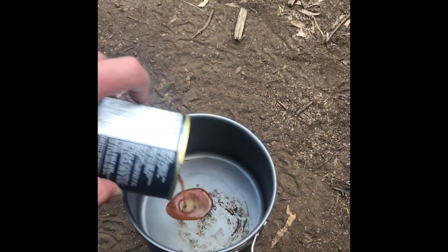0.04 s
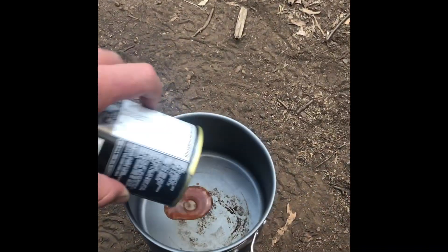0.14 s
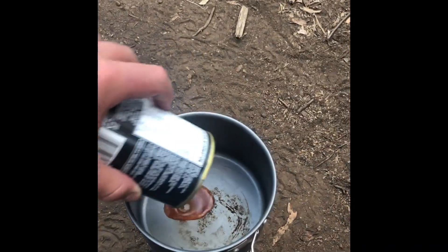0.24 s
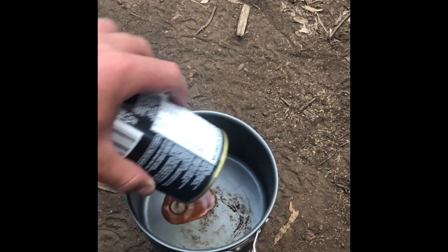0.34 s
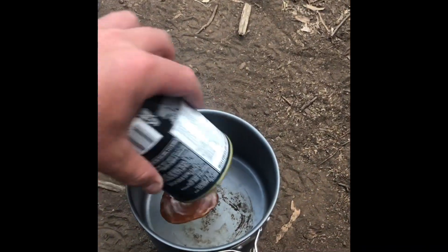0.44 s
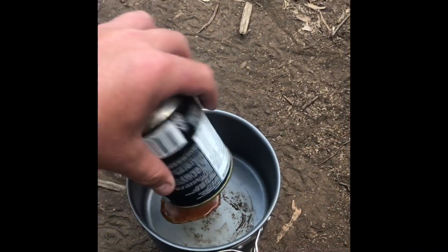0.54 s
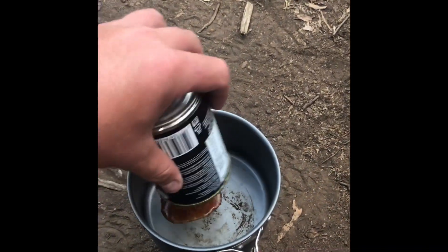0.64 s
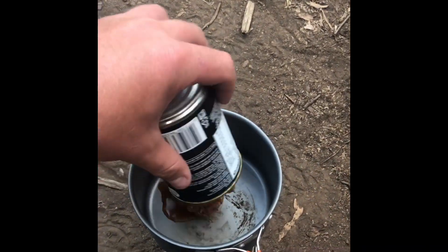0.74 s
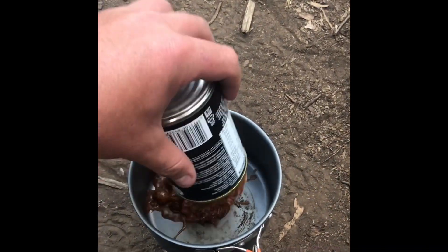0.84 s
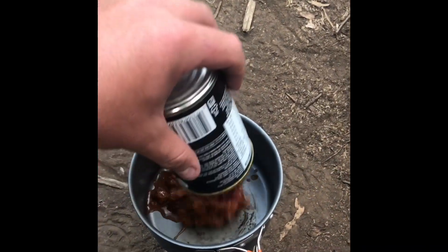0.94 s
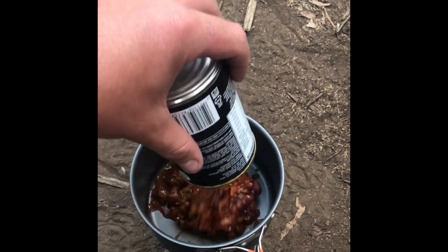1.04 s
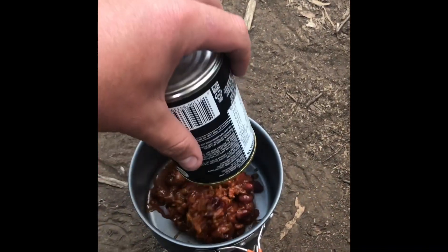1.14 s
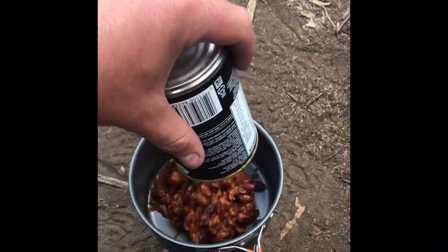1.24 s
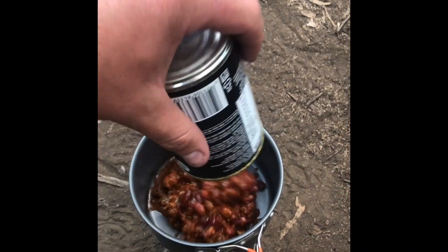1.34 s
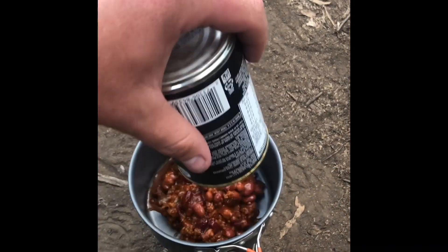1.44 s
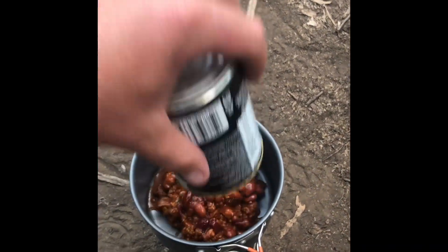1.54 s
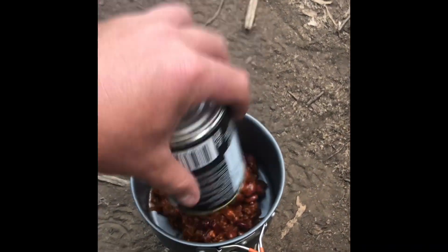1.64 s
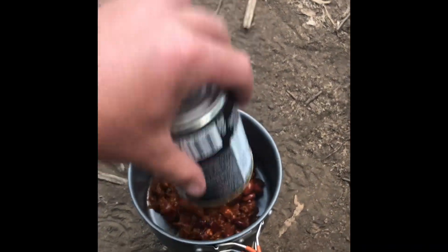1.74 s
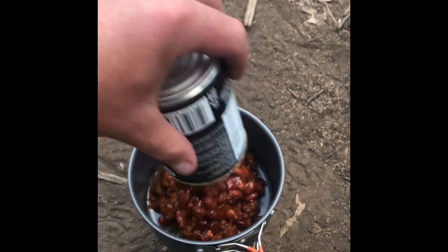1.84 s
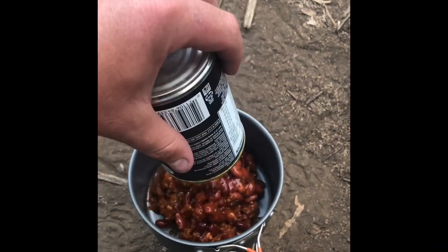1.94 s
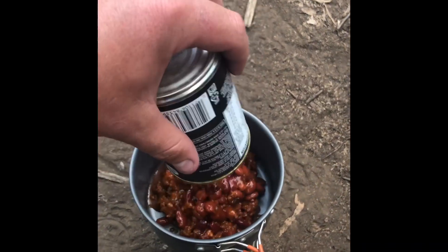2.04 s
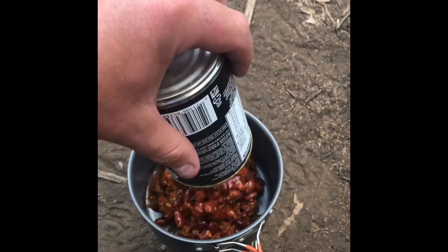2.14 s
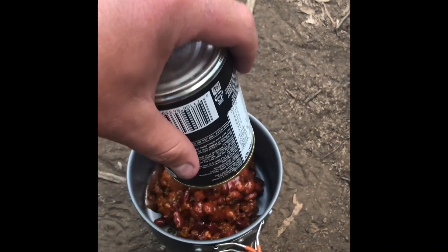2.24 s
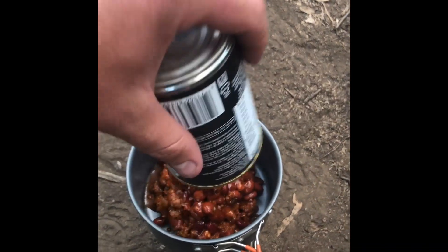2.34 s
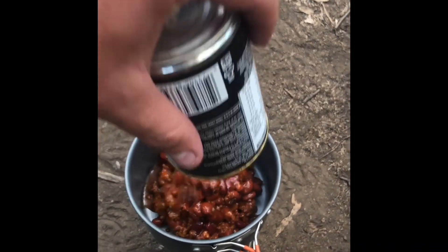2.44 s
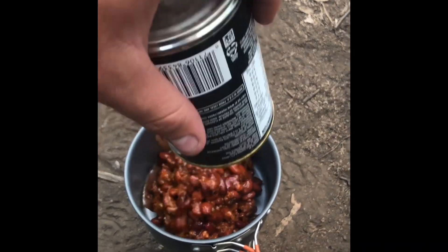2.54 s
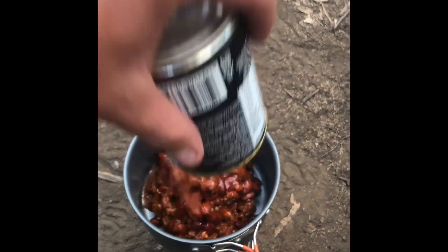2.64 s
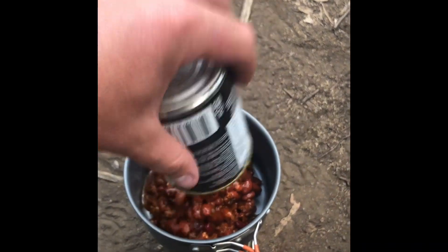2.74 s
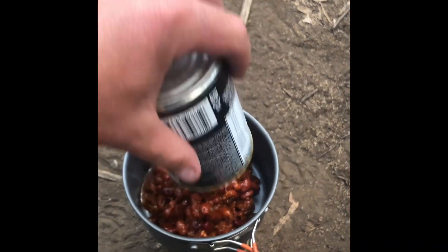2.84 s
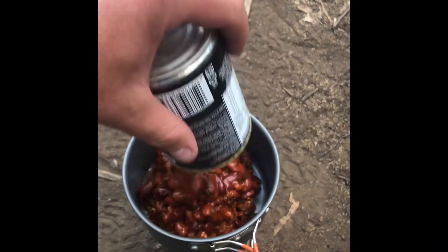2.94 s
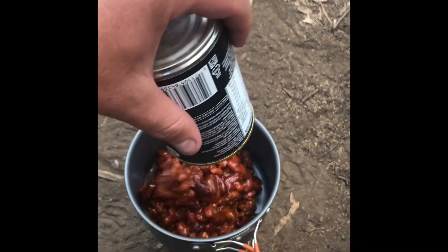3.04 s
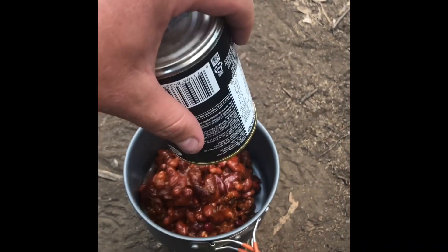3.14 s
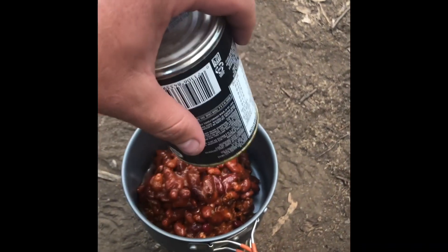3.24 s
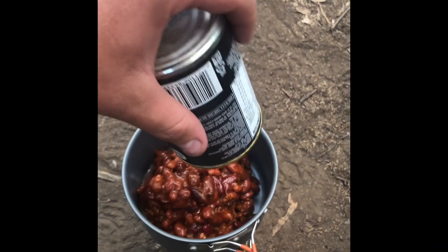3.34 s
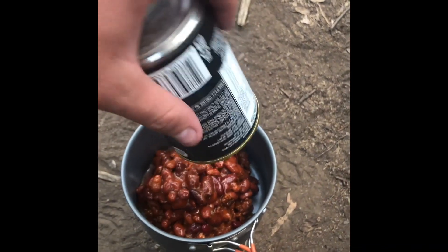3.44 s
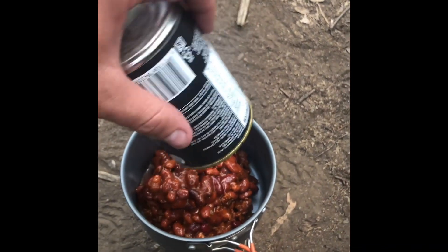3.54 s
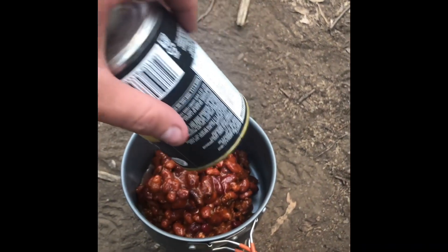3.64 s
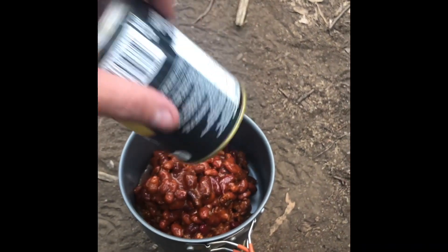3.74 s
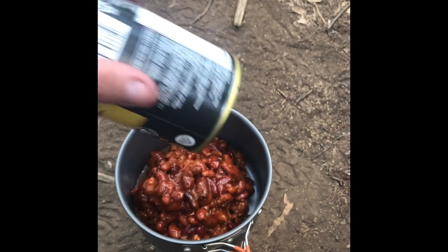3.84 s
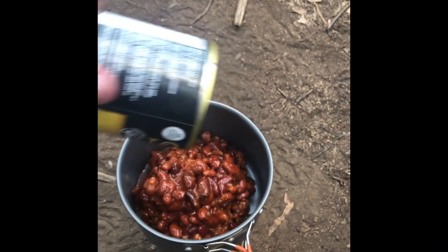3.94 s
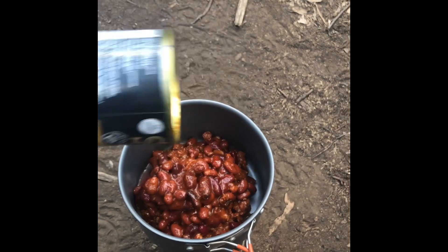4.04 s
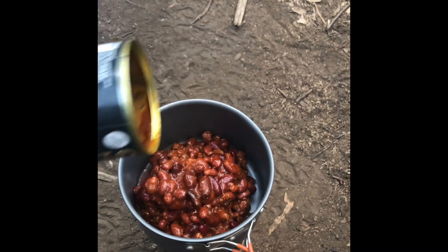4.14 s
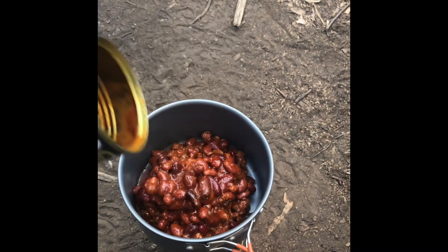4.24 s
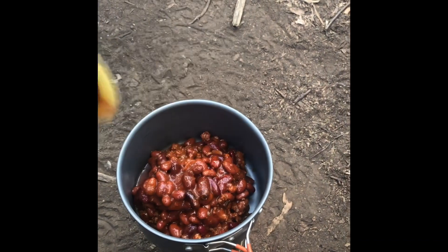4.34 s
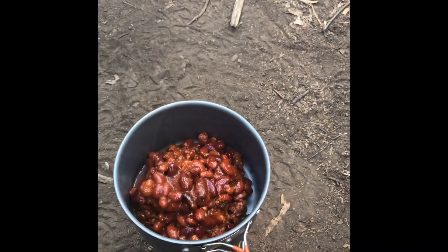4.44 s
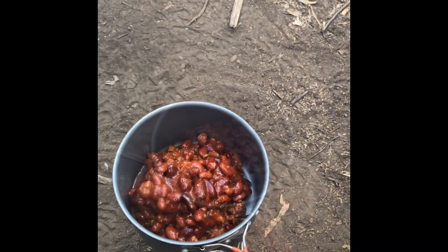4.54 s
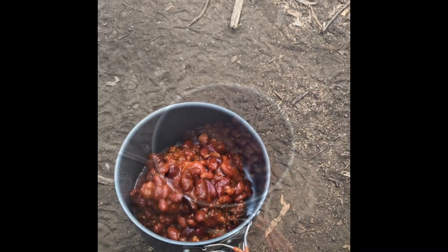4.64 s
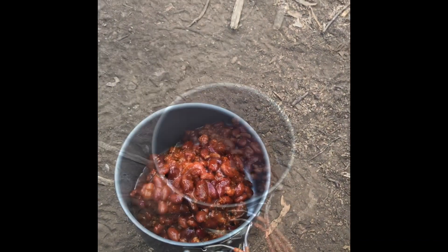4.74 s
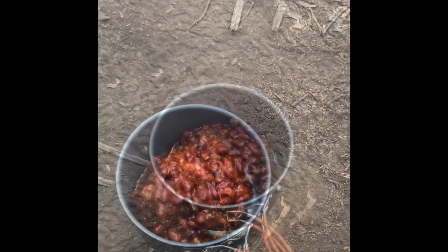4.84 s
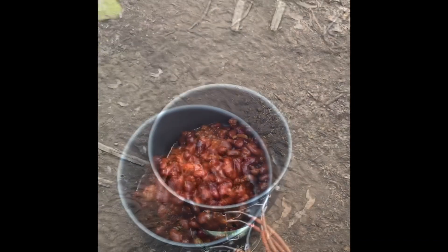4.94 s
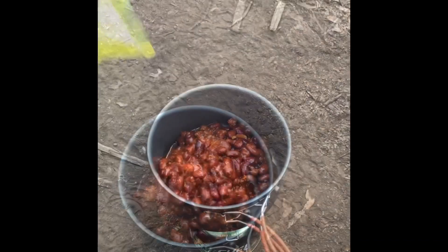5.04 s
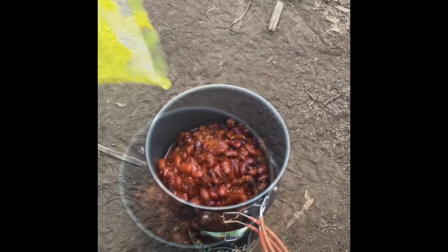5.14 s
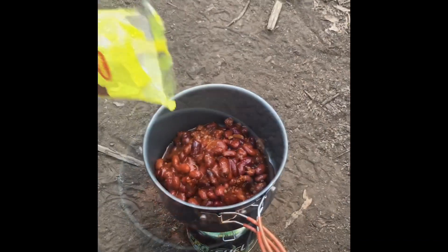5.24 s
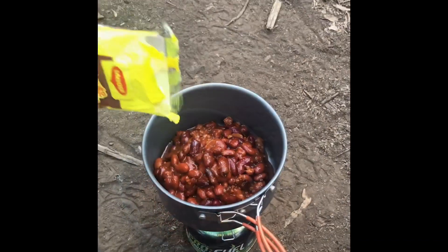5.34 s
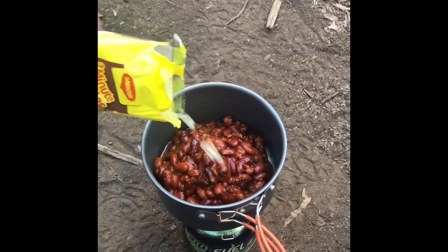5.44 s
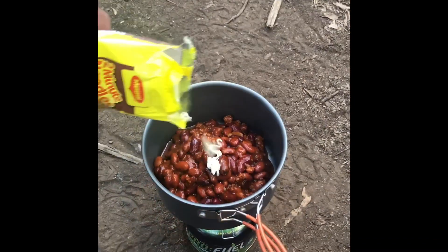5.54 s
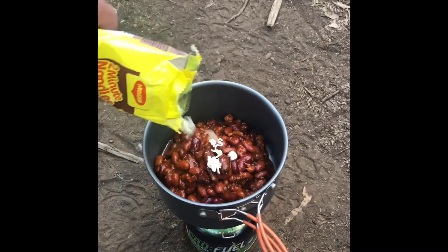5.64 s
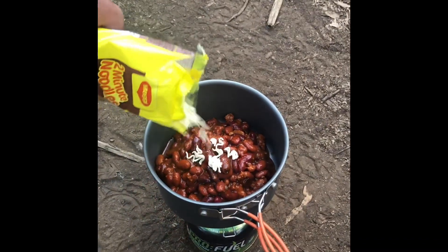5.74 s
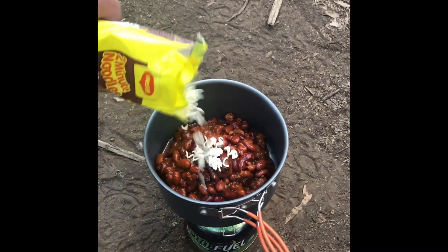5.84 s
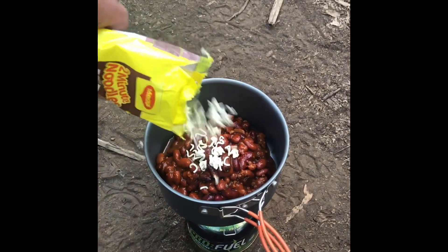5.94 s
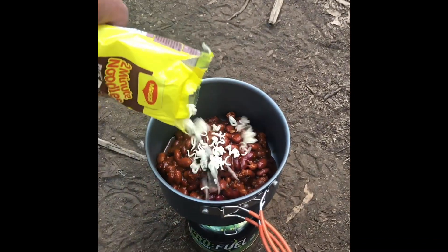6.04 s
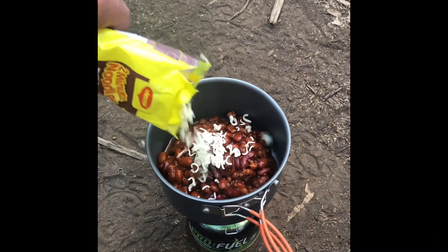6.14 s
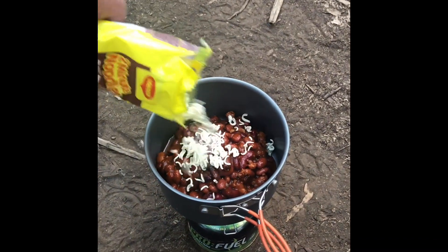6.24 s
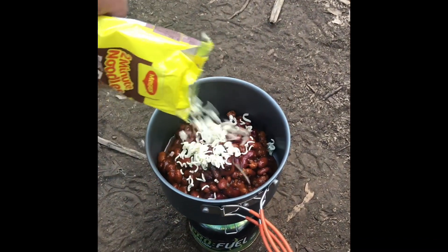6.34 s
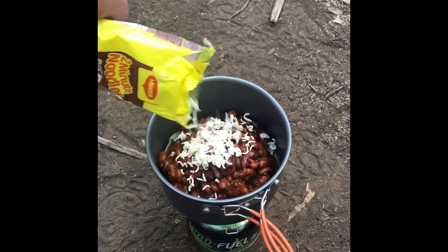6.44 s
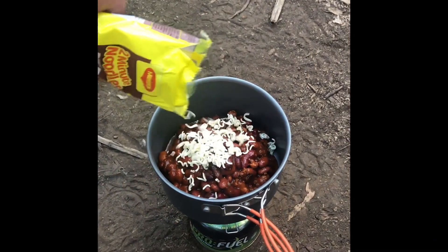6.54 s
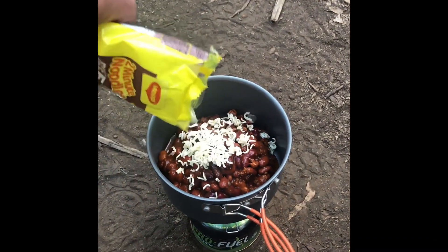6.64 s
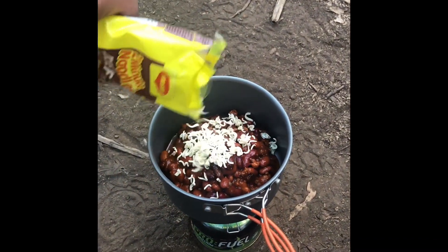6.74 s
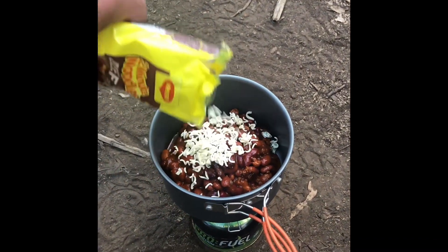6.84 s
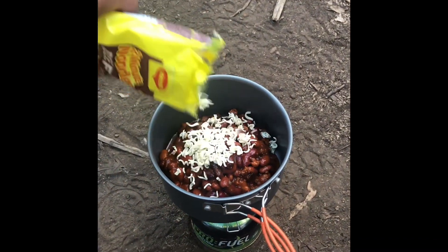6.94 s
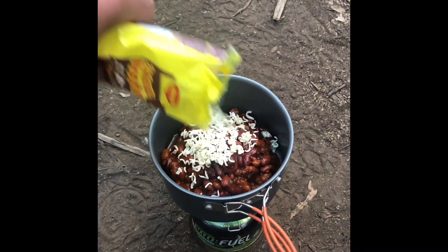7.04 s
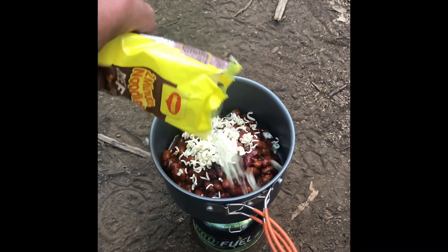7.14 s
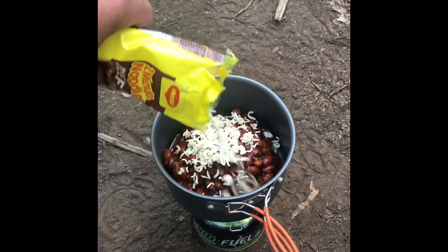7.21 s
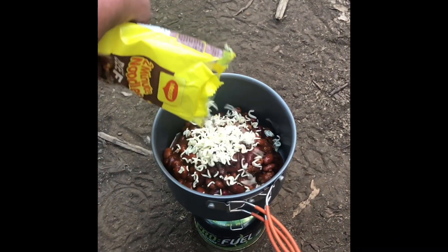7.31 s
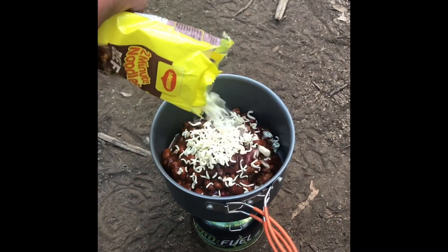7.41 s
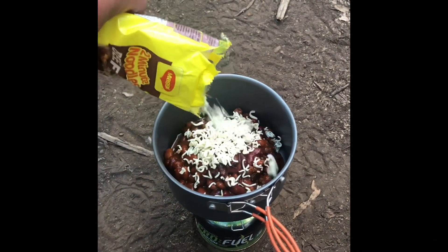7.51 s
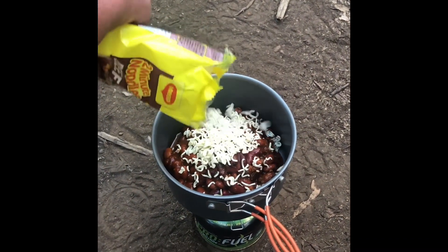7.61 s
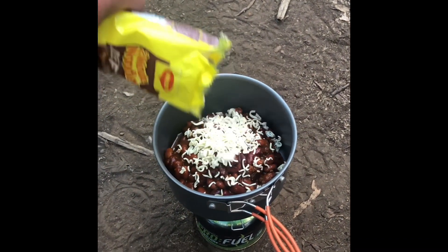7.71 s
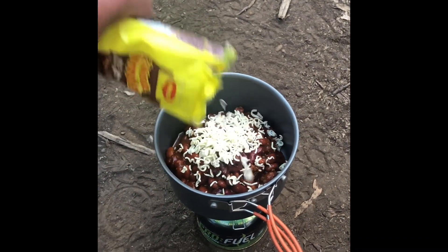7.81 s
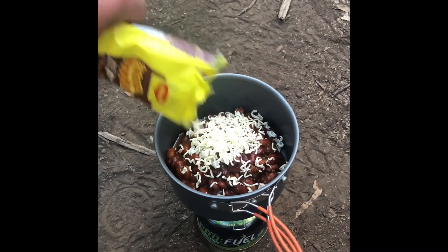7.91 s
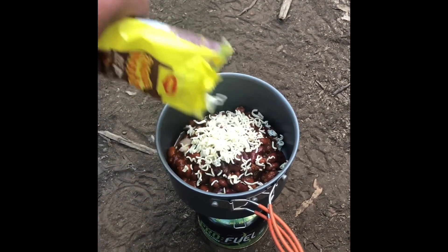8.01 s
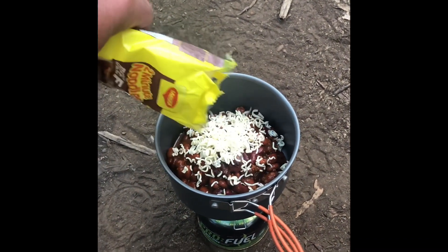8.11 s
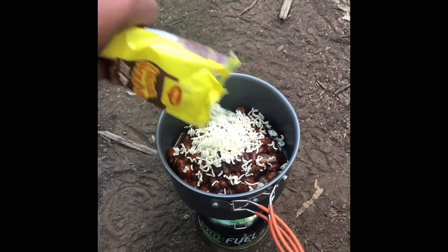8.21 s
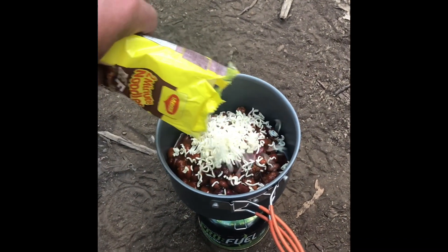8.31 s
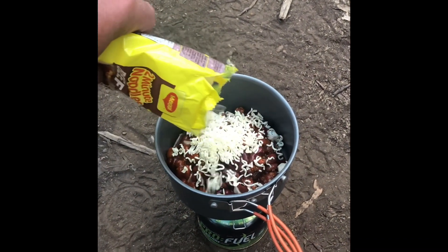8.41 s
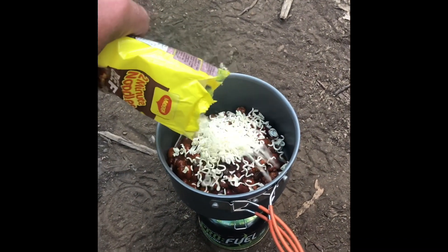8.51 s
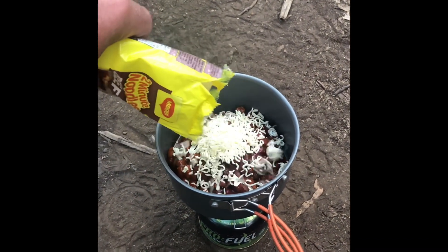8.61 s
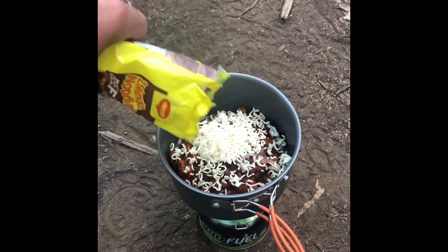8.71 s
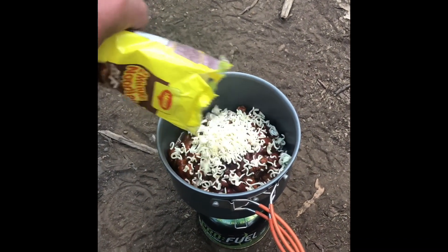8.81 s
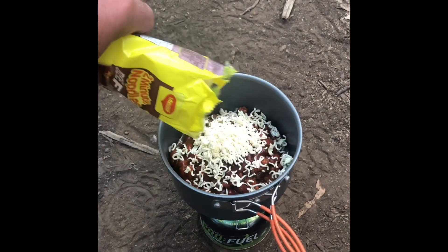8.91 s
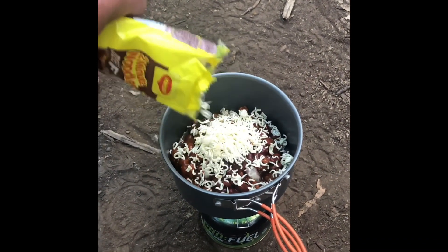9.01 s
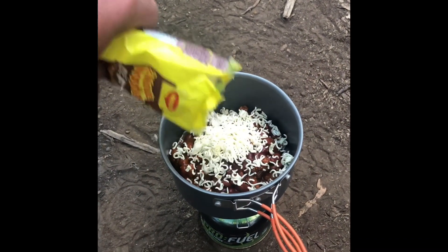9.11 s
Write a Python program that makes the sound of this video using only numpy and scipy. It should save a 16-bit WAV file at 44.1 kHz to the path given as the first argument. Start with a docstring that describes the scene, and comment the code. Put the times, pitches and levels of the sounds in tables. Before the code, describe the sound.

Close, dry outdoor cooking, the same in both channels, with a low, slightly fluttering gas-burner roar throughout. From 0 s a light sizzle resonates in a metal pot, with a faint hollow hum from the can gliding upward. At about 0.75 s a lump of stew lands with a quick wet double plop and dull slap; the sizzle jumps bright and loud until about 1.3 s, then falls away by 2.2 s into a quiet simmer of fine, clicking bubbles. Small plops come at 2.4, 2.6 and 2.9 s. Around 4.75 s the burner dips in a cross-fade. From 5.1 s plastic crinkles; shakes send dry crumbs rushing and pattering in uneven swells. Sharp ticks on the pot wall begin near 6 s, cluster at 7.2 s, peak at 7.64 s, and thicken from 8.2 to 8.8 s. Creases snap until the end, just after 9 s.

```python
"""Stew into a hot pot, then a shaken packet

Canned stew plops into a hot metal pot and sizzles up: noise shaped by pot resonances, tonal plops, bursts.
Meanwhile the can's air hums as narrow noise. After a cross-fade dry crumbs rush and patter in a shaken
plastic packet (shaped noise), its creases snap (noise bursts) and crumbs tick on the pot wall (decaying
modes). A gas burner's low roar (shaped noise) lies under both scenes. Both channels are the same."""
import sys
import numpy as np
from scipy import signal
from scipy.fft import rfft, irfft, next_fast_len
from scipy.io import wavfile
from scipy.ndimage import uniform_filter1d, map_coordinates

SR = 44100
rng = np.random.default_rng(int(sys.argv[2]) if len(sys.argv) > 2 else 0)


def dump(signal):
    """Clip the signal to [-1, 1] and save it as 16-bit WAV at the path in sys.argv[1]."""
    limited = np.clip(np.atleast_2d(signal).T, -1, 1)
    pcm = np.round(limited * 32767).astype(np.int16)
    wavfile.write(sys.argv[1], SR, pcm)


N = 404397
TOP_HZ = 15850  # band limit


def amp(db):
    """Gain of a level in dB."""
    return 10 ** (np.asarray(db) / 20)


def unit(x):
    """Scaled to rms 1."""
    return x / np.sqrt(np.mean(x ** 2) + 1e-20)


def along(points, hz):
    """(Hz, value) points read on a log axis."""
    f, v = np.transpose(points)
    return np.interp(np.log(hz + 1), np.log(f + 1), v)


def curves(rows, outside=None):
    """One value per sample for each column after the time."""
    s, *cols = np.transpose(rows)
    return [np.interp(np.arange(N) / SR, s, c, outside, outside) for c in cols]


def wobble(rate):
    """A smooth random curve, rate knots a second."""
    knots = rng.standard_normal(int(N * rate / SR) + 4)
    return map_coordinates(knots, [np.arange(N) * rate / SR])


def filtered(x, response):
    """x times a response of frequency."""
    m = next_fast_len(N + 8192)
    return irfft(rfft(x, m) * response(np.fft.rfftfreq(m, 1 / SR)), m)[..., :N]


def fizz(grain_db, clump_db, patchy_db):
    """White noise with fast and slow random gain, and patches of gain in time and frequency."""
    bursts = rng.standard_normal(N) * amp(grain_db * wobble(1500) + clump_db * wobble(70))
    z = signal.stft(bursts, nperseg=512)[2]
    field = uniform_filter1d(rng.standard_normal(z.shape), 8, 0)
    field = uniform_filter1d(field, 30, 1)
    return signal.istft(z * amp(patchy_db * unit(field)), nperseg=512)[1][:N]


def burst(db, hz, t60):
    """A decaying burst of noise, broad around its centre, at a peak level."""
    b, a = signal.butter(2, [hz / 1.74, min(hz * 1.55, 16000)], "bandpass", fs=SR)
    decay = amp(-60 * np.arange(SR // 20) / SR / t60)
    x = signal.lfilter(b, a, decay * rng.standard_normal(SR // 20))
    return amp(db) * x / abs(x).max()


# steam of the sizzle, before brightening: [t/s, level/dB]
STEAM = [(0, -36), (.5, -39.5), (.77, -35.5), (.81, -27.5), (.96, -30), (1.08, -28), (1.21, -28),
         (1.6, -36), (2.2, -47.5), (3, -52), (4.2, -55.5), (4.85, -56), (5.3, -57)]
# how full the pot is: [t/s, state: 0 bare, 1 can in its mouth, 2 filled]
POT_FILL = [(0, 0), (.7, 0), (.8, 1), (1.7, 1), (2.4, 1.6), (4, 2)]
# air resonances of the pot in each state: [f/Hz, width/Hz, relative level/dB]
BARE_POT = [(749, 360, 0), (1700, 160, -1), (2740, 270, -6), (3358, 220, -5.5), (8820, 1240, -6.5),
            (11000, 1100, -6), (13700, 1600, -1)]
CANNED_POT = [(661, 87, 0.5), (1530, 99, 1), (3140, 400, -10), (7150, 130, -9.5), (14190, 680, -3.5)]
FILLED_POT = [(810, 280, 11), (1580, 110, 1.5), (2310, 380, 0), (3170, 230, 5.5), (4567, 1900, 0),
              (6700, 330, 3.5), (7350, 230, -0.5), (13500, 1200, 2)]
# floor between the resonances, one list per state: [f/Hz, relative level/dB]
POT_FLOORS = [
    [(500, -18), (2100, -12), (6000, -9), (15000, -18)],
    [(500, -9), (2000, -15.5), (6000, -11), (12500, -9.5), (15500, -17)],
    [(500, -12), (2000, -18), (8000, -6), (15500, -6)],
]
HOLLOW_DB, HOLLOW_GROWS = -35, 0.39  # lower part: level at 0 dB of steam, dB per dB of steam
BRIGHT_FROM_DB, BRIGHTENS = -36.5, 0.43  # steam above this level gains treble, dB per dB


def sizzle():
    """Steam bubbles on the hot floor sound through the pot's air, whose resonances change as it fills."""
    steam_db, = curves(STEAM, outside=-140)
    hollow_db = HOLLOW_DB + HOLLOW_GROWS * steam_db
    fill, = curves(POT_FILL)
    bubbles = fizz(grain_db=1.0, clump_db=0.75, patchy_db=1.5)
    out = 0

    def low(hz):
        return 1 / (1 + (hz / 2100) ** 8)

    for state, (modes, floor) in enumerate(zip((BARE_POT, CANNED_POT, FILLED_POT), POT_FLOORS)):
        def pot(hz):
            power = sum(amp(2 * db) / (1 + (2 * (hz - c) / w) ** 2) for c, w, db in modes)
            return np.sqrt(power + amp(2 * along(floor, hz)))

        hollow = filtered(bubbles, lambda hz: pot(hz) * low(hz) / (1 + (450 / (hz + 1)) ** 6))
        steam = filtered(bubbles, lambda hz: pot(hz) * (1 - low(hz)) * (hz < TOP_HZ))
        share = np.clip(1 - abs(fill - state), 0, 1)  # states blend into each other
        out = out + share * (amp(steam_db) * unit(steam) + amp(hollow_db) * unit(hollow))
    treble = filtered(out, lambda hz: 1 / (1 + (8000 / (hz + 1)) ** 4))
    extra_treble = amp(BRIGHTENS * np.maximum(steam_db - BRIGHT_FROM_DB, 0)) - 1
    return out + extra_treble * treble


# lumps dropping into the sauce: [t/s, note level/dB, starting f/Hz]
LUMPS = [(.7535, -25.5, 800), (.763, -17.5, 740), (2.426, -25.5, 790), (2.623, -30, 800), (2.868, -29, 604)]
PLOP_T60_S = 0.026
SLAP_DB, SLAP_GROWS = 20.5, 2.35  # slap peak at a 0 dB note, dB per dB of note


def food():
    """A plop is a short rising note of trapped air, with a dull slap that grows fast with the lump."""
    out, t = np.zeros(N + SR), np.arange(SR // 20) / SR
    for s, db, hz in LUMPS:
        envelope = amp(db - 60 * t / PLOP_T60_S) * (1 - np.exp(-t / 0.002))
        note = envelope * np.sin(2 * np.pi * hz * t * (1 + 2.6 * t))
        slap = burst(SLAP_DB + SLAP_GROWS * db, 2300, t60=0.0099)
        out[round(s * SR):][:len(t)] += note + slap
    return out[:N]


# single bubbles bursting: [t/s, peak level/dB, centre f/Hz]
BUBBLE_BURSTS = [(2.5132, -33, 13500), (2.645, -32, 9000), (2.904, -35, 3500), (2.99, -33, 5200),
                 (3.5474, -32, 8000)]
SIMMER, SIMMER_DB = 120, 7.5  # number of random bubbles; their usual peak over the steam, dB


def spits():
    """Single bubbles burst with a click; others, usually bright, come at random as the stew simmers."""
    out, when = np.zeros(N + SR), rng.uniform(1.8, 5.2, SIMMER)
    size, pitch = rng.standard_normal((SIMMER, 2)).T
    steam_db = curves(STEAM)[0][(when * SR).astype(int)]
    centre = np.clip(11000 * np.exp(.3 * pitch), 900, 14000)
    simmering = zip(when, steam_db + SIMMER_DB + 3 * size, centre)
    for s, db, hz in [*BUBBLE_BURSTS, *simmering]:
        out[round(s * SR):][:SR // 20] += burst(db, hz, t60=0.0079)
    return out[:N]


# hollow note of the air in the can, rising as it tips: [t/s, f/Hz, mean level/dB]
CAN_NOTE = [(0, 642, -45.5), (.4, 689, -52), (.76, 773, -49), (.9, 890, -45), (1.3, 927, -48),
            (1.75, 944, -59)]


def can():
    """The sizzle excites the can's air: narrow noise around a gliding pitch."""
    hz, db = curves(CAN_NOTE, outside=-120)
    turn = 2 * np.pi * np.cumsum(hz) / SR
    level = amp(db + 3.6 * wobble(21.8))
    narrow = wobble(190) * np.cos(turn) + wobble(190) * np.sin(turn)
    return level * unit(narrow)


# shakes of the packet: [peak t/s, level of the crumbs' rush/dB, length/s]
PACKET_SHAKES = [(5.346, -40.5, 0.27), (5.734, -47, 0.29), (5.873, -45, 0.41), (6.125, -45.5, 0.075),
                 (6.282, -41.5, 0.11), (6.53, -46.5, 0.1), (6.7, -46.5, 0.28), (6.9, -45, 0.14),
                 (6.983, -44.5, 0.05), (7.118, -44.5, 0.23), (7.28, -42.5, 0.38), (7.935, -42.5, 0.15),
                 (8.143, -40.5, 0.14), (8.37, -39, 0.2), (8.522, -40, 0.033), (8.746, -46.5, 0.17),
                 (8.94, -44, 0.12), (9.16, -44, 0.095)]
EDGE_DB, RISE_SHARE = 5.5, 0.37  # softer by this at both ends; share of the length before the peak


def sliding_db(t):
    """Level of the crumbs' rush at times t: each shake swells to its peak and dies."""
    power = 0
    for s, db, length in PACKET_SHAKES:
        away = np.maximum((s - t) / RISE_SHARE, (t - s) / (1 - RISE_SHARE)) / length
        power = power + amp(2 * (db - EDGE_DB * away))
    return 10 * np.log10(power)


# colour of the rush and of the patter: [f/Hz, relative density level/dB]
RUSH_COLOUR = [(300, -22), (631, -3.5), (1050, -6), (1890, -11), (2500, -9.5), (8000, -16.5), (12000, -42)]
PATTER_COLOUR = [(2500, -16.5), (4500, -8.5), (7000, -3), (10000, -2.5), (14300, 6), (15800, -6)]
# crumbs striking the pot wall: [t/s, peak level/dB, extra ring of the modes near 5 kHz/dB]
WALL_HITS = [(5.9744, -25, -6), (6.0752, -15, 3), (6.0911, -19.5, -3), (6.1394, -18, 17.5),
             (6.323, -19.5, 25), (6.393, -14.5, 10.5), (6.4184, -14.5, -3), (6.4774, -19, -28),
             (6.4818, -14, -9), (6.673, -21, -17), (7.1558, -8, -6), (7.1624, -15, 2), (7.1933, -9, -3),
             (7.2003, -16, -6), (7.208, -6, -5), (7.23, -8, -9), (7.2333, -8.5, -12), (7.2438, -18, -4),
             (7.2616, -12.5, -18), (7.3167, -16, -16), (7.452, -17.5, -26), (7.4952, -9.5, -20.5),
             (7.55, -20, -22), (7.58, -14, -1), (7.6114, -25, 3.5), (7.636, 1.5, -3.5), (7.653, -17, -14),
             (7.6652, -20.5, -2), (7.6834, -22, -14), (7.88, -18.5, -15.5), (8.0601, -17, 3),
             (8.0874, -18.5, -3), (8.188, -17, -8), (8.2547, -13, -29), (8.2583, -15, -20),
             (8.3055, -7.5, -9), (8.331, -13.5, -8), (8.3934, -16, 2), (8.4009, -13.5, 5),
             (8.4045, -15, -8), (8.47, -21.5, -8), (8.516, -10, -12), (8.5344, -18, -11), (8.542, -17, -5),
             (8.5544, -19, -7), (8.5679, -10.5, -7.5), (8.5989, -25, -8), (8.623, -17, -10),
             (8.6357, -19.5, -11), (8.656, -17, -9), (8.667, -15, -22), (8.743, -14.5, 4),
             (8.7815, -28, -20), (8.7945, -27, -20), (8.81, -14, -16), (8.8257, -14.5, 1),
             (8.9184, -22, -8), (9.015, -23, -28)]
PATTER_DB = -1  # patter relative to the rush
SPRAY_DB, SPRAY_GROWS = -38, 0.43  # smaller crumbs: level at a 0 dB tick, dB per dB of tick
SPRAY_S, SPRAY_LAG_S = 0.019, 0.019  # their spread, and delay behind the tick


def packet():
    """Crumbs slide with a dull rush and rain on the food as a clumped patter, thickest just after ticks."""
    t = np.arange(0, N, 32) / SR  # coarse time grid
    spray_power = 0
    for s, db, _ in WALL_HITS:
        swell = np.exp(-((t - s - SPRAY_LAG_S) / SPRAY_S) ** 2)
        spray_power = spray_power + amp(2 * (SPRAY_DB + SPRAY_GROWS * db)) * swell
    now = np.arange(N) / SR
    slide = np.interp(now, t, amp(sliding_db(t)))
    spray = np.interp(now, t, np.sqrt(spray_power))
    rush = filtered(fizz(grain_db=2.0, clump_db=1.73, patchy_db=1.0),
                    lambda hz: amp(along(RUSH_COLOUR, hz)))
    patter = filtered(fizz(grain_db=4.5, clump_db=2.0, patchy_db=1.9),
                      lambda hz: amp(along(PATTER_COLOUR, hz)) * (hz < TOP_HZ))
    return slide * unit(rush) + np.hypot(amp(PATTER_DB) * slide, spray) * unit(patter)


# modes of the pot wall: [f/Hz, relative level/dB, t60/s]
WALL_MODES = [(2783, -1, 0.064), (3908, -4.5, 0.069), (4990, 2.5, 0.029), (5300, -4.5, 0.037),
              (6020, -18, 0.034), (6930, -11, 0.028), (8290, -6, 0.025), (11150, -14.5, 0.0068),
              (11400, -4, 0.017), (12810, -3.5, 0.013), (14470, -0.5, 0.011)]


def ticks():
    """Each crumb chatters on the wall for a few ms, heard directly and ringing the wall at new strengths."""
    out, t = np.zeros(N + SR), np.arange(SR // 12) / SR
    hz, level, t60 = (c[:, None] for c in np.transpose(WALL_MODES))
    # a crumb is too small to radiate much low
    small = signal.butter(8, 4650, "highpass", fs=SR, output="sos")
    for s, db, ring_db in WALL_HITS:
        strength = level + rng.normal(0, 2.6, hz.shape) + np.where(abs(hz - 5000) < 500, ring_db, 0)
        # the damped wall answers each spot a little differently
        spot = hz * (1 + 0.0052 * rng.standard_normal(hz.shape))
        wall = (amp(strength - 60 * t / t60) * np.sin(2 * np.pi * spot * t)).sum(0)
        noise = rng.standard_normal(len(t))
        # random gain held for 40 samples at a time makes the chatter uneven
        uneven_db = 4.8 * np.repeat(rng.standard_normal(len(t)), 40)[:len(t)]
        contact = noise * amp(uneven_db - 60 * t / 0.018) * (1 - np.exp(-t / 0.000095))
        chatter = np.diff(contact, prepend=0)
        ringing = signal.fftconvolve(chatter, wall)[:len(t)]
        whole = unit(ringing) + amp(3.5) * unit(chatter)
        tick = signal.sosfilt(small, whole) + amp(-18) * whole
        out[round(s * SR):][:len(t)] += amp(db) * tick / abs(tick).max()
    return out[:N]


# creases of the plastic snapping: [t/s, peak level/dB, centre f/Hz]
CREASES = [(5.437, -22, 6960), (5.0956, -37, 3100), (5.8656, -22.5, 4860), (6.17, -27, 4730),
           (6.5106, -28, 4620), (6.562, -24, 4600), (6.903, -25.5, 5000), (6.707, -28, 1770),
           (8.761, -26, 2430), (8.934, -22.5, 5030), (9.1403, -22.5, 7100)]
CRACKLES = 90  # number of random creases, their level following the rush
CRACKLE_DB, CRACKLE_SPREAD_DB, CRACKLE_HZ = 7, 2.2, 3480  # peak over the rush, scatter, usual centre


def snaps():
    """A crease gives a burst of a few ms, broad around its own centre; others come at random."""
    out = np.zeros(N + SR)
    when = rng.uniform(5, N / SR, CRACKLES)
    size, pitch = rng.standard_normal((CRACKLES, 2)).T
    peak_db = sliding_db(when) + CRACKLE_DB + CRACKLE_SPREAD_DB * size
    centre = np.clip(CRACKLE_HZ * np.exp(.45 * pitch), 900, 9000)
    for s, db, hz in [*CREASES, *zip(when, peak_db, centre)]:
        out[round(s * SR):][:SR // 20] += burst(db, hz, t60=.015)
    return out[:N]


# burner loudness, with a dip as the first scene fades out and the second fades in: [t/s, mean level/dB]
BURNER_LEVEL = [(0, -42.5), (4.3, -42), (4.75, -46.5), (5.2, -42), (9.17, -41.5)]
# colour of the flame roar: [f/Hz, relative density level/dB]
ROAR_COLOUR = [(30, -64), (46, -23.5), (141, -1.5), (216, -7.5), (249, -13.5), (382, -16.5), (560, -28.5),
               (900, -55)]


def burner():
    """The gas flame roars as low, shaped noise and flutters a little."""
    roar = filtered(rng.standard_normal(N), lambda hz: amp(along(ROAR_COLOUR, hz)))
    return amp(curves(BURNER_LEVEL)[0] + 0.22 * wobble(6)) * unit(roar)


def scene():
    """All sources summed, the same in both channels."""
    mix = burner() + sizzle() + food() + spits() + packet() + snaps() + ticks() + can()
    return np.tile(mix, (2, 1))


def record(dry):
    """Nothing is kept above the band limit."""
    return filtered(dry, lambda hz: hz < TOP_HZ)


dry = scene()
out = record(dry)
dump(out)
```